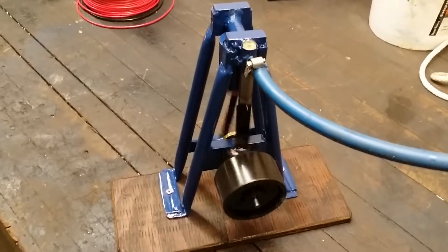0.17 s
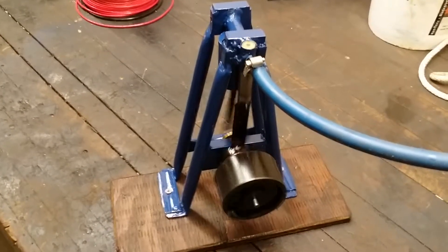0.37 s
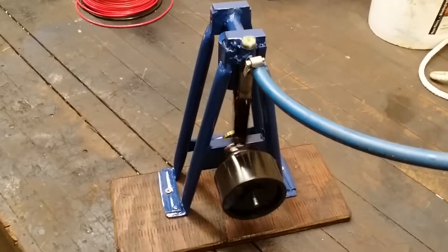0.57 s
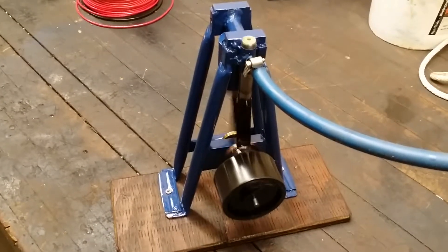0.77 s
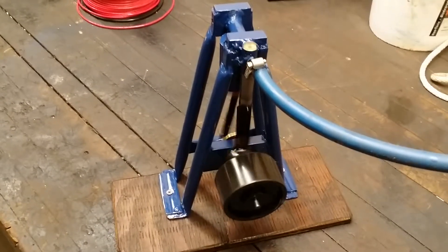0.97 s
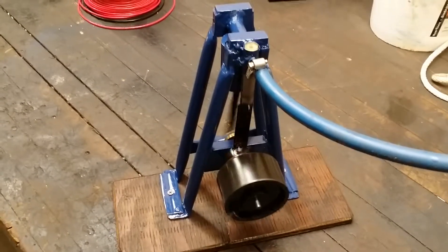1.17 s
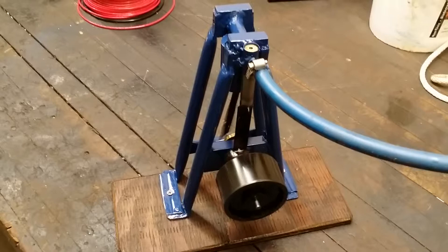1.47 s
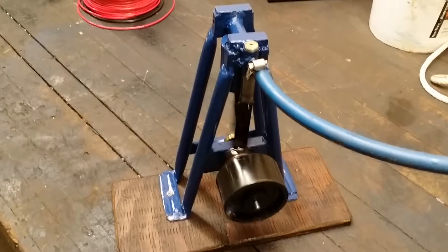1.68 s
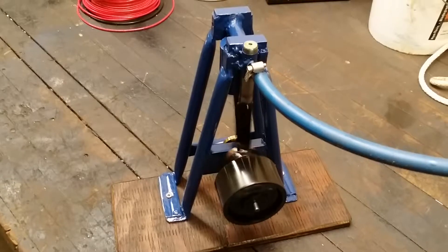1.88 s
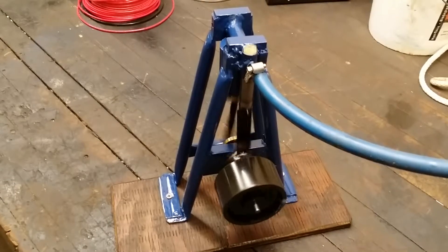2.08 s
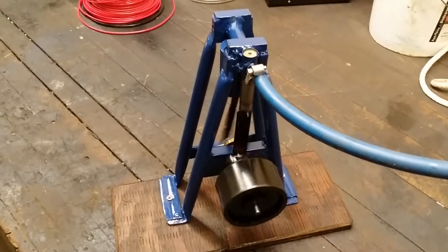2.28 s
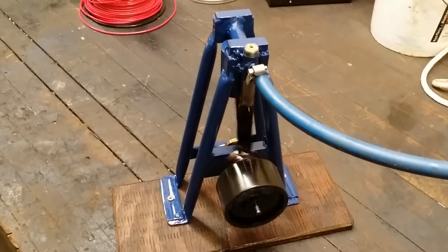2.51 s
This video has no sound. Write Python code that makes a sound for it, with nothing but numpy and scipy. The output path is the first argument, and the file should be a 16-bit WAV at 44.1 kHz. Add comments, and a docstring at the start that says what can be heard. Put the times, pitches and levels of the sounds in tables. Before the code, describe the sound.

A small air-driven engine chuffs rapidly, each turn a sharp whistling hiss and metallic knocks.

```python
"""A steady workshop rumble and a swell of hiss come first, then a crank knock and a rising whistle.
A small oscillating-cylinder engine on a wooden bench runs on compressed air, about six turns a second.
Each turn the opening port gives an edge tone and jet noise, and the crank knocks at both dead centres,
exciting the modes of frame and board. Short echoes follow; the rumble is shaped noise with faint tones.
The two microphones colour the treble differently, and the recorder ducks under the whistles."""
import sys
import numpy as np
from scipy import signal
from scipy.fft import rfft, irfft, next_fast_len
from scipy.io import wavfile

SR = 44100
rng = np.random.default_rng(int(sys.argv[2]) if len(sys.argv) > 2 else 0)


def makeup_ratio(level_db):
    """Linear amplitude ratio for a level in decibels (20 dB per factor of ten)."""
    decades = np.asarray(level_db, float) / 20
    return 10 ** decades


def digitize_waveform(pressure):
    """Quantize a signal to 16-bit integers and store it at the path in sys.argv[1].

    Rows of a 2-D input are taken as channels; values are limited to [-1, 1].
    """
    field = np.atleast_2d(pressure).T
    bounded = np.clip(field, -1, 1)
    quanta = np.round(bounded * 32767).astype(np.int16)
    wavfile.write(sys.argv[1], SR, quanta)


N = 116865   # samples
PAD = next_fast_len(N + SR // 2)   # room for filter tails
GRID = np.arange(PAD // 2 + 1) * SR / PAD + 1e-3   # Hz, kept above 0 for the logarithm


def rms_one(x):
    """Normalisation to unit root-mean-square."""
    return x / np.sqrt(np.mean(x ** 2) + 1e-20)


def at_hz(hz, values):
    """Interpolation of a spectrum along logarithmic frequency, onto GRID."""
    return np.interp(np.log(GRID), np.log(hz), values)


def panned(x, db):
    """Intensity stereo: left minus right is db."""
    return np.array([x * makeup_ratio(db / 2), x * makeup_ratio(-db / 2)])


def drift(hz):
    """Low-pass random process: white noise through two equal poles at hz, rms 1."""
    pole = np.exp(-2 * np.pi * hz / SR)
    noise = rng.standard_normal(N + SR)
    slow = signal.lfilter([1], [1, -2 * pole, pole * pole], noise)
    return rms_one(slow[SR:])


def stereo_noise(spectrum, alike):
    """Partial coherence: mid and side noise mixed to a left-right likeness per frequency, rms 1."""
    mid, side = rfft(rng.standard_normal((2, PAD)))
    alike = np.clip(alike, -1, 1)
    pair = np.sqrt(1 + alike) * mid + np.sqrt(1 - alike) * side * [[1], [-1]]
    colour = makeup_ratio(at_hz(*np.transpose(spectrum)))
    return rms_one(irfft(pair * colour, PAD)[:, :N])


def ring(x, hz, t60):
    """Damped resonator: a unit click starts a sine of height 1 before decay, falling 60 dB in t60 s."""
    pole = makeup_ratio(-60 / (t60 * SR))
    angle = 2 * np.pi * hz / SR
    return signal.lfilter([0, np.sin(angle)], [1, -2 * pole * np.cos(angle), pole * pole], x + 1e-18)


# Rumble spectrum: (frequency [Hz], relative density [dB])
RUMBLE = [(25, -62), (50, -75), (66, -15.5), (76, 0), (100, -12), (130, -4), (152, -13.5), (178, -14),
          (200, 0.5), (240, -4.5), (290, -12), (520, -17.5), (700, -19.5), (1300, -20), (2200, -22.5),
          (3200, -30.5), (15000, -33)]
# Coherence of the rumble between the ears: (frequency [Hz], left-right likeness [0 to 1])
LIKENESS = [(30, 0.69), (60, 0.98), (200, 0.95), (400, 0.86), (700, 0.24), (1200, 0.014), (2400, 0.055)]
# Wavering tones, equal in both channels: (frequency [Hz], level [dB], bandwidth [Hz])
HUMS = [(708, -48.5, 8), (938, -50.5, 2.5), (969, -52, 2.5)]
RUMBLE_DB, RUMBLE_SWAY_DB, RUMBLE_SWAY_HZ = -28, 1.5, 30.5


def workshop():
    """Room resonance: rumble peaks at the low modes, and narrow-band noise is heard as wavering tones."""
    level = RUMBLE_DB + RUMBLE_SWAY_DB * drift(RUMBLE_SWAY_HZ)
    out = makeup_ratio(level) * stereo_noise(RUMBLE, at_hz(*np.transpose(LIKENESS)))
    for hz, db, width in HUMS:
        t60 = np.log(1000) / (np.pi * width)   # decay time of a resonance this wide
        tone = ring(rng.standard_normal(N + SR), hz, t60)[SR:]   # the build-up is left off
        out = out + makeup_ratio(db) * rms_one(tone)
    return out


# Turn marks, one per whistle: (time [s], whistle level relative to the others [dB])
TURNS = [(0.0378, -10.5), (0.1971, -9.5), (0.3559, -9), (0.5151, -8.5), (0.6747, -10), (0.835, -10.5),
         (0.9948, -10.5), (1.1544, -8), (1.3134, -9), (1.4726, -8.5), (1.631, -9.5), (1.7895, -8.5),
         (1.9495, -8.5), (2.1084, -10), (2.2686, -11), (2.4278, -9), (2.59, -11.5)]
TURN_S = 0.1594   # nominal period


def crank():
    """Periodic motion: turn number and time after its mark [s], for every sample."""
    marks = np.array(TURNS)[:, 0]
    first = FLOW[0][0]   # the flow begins ahead of the mark
    t = np.arange(N) / SR
    turn = np.clip(np.searchsorted(marks + first, t) - 1, 0, len(marks) - 1)
    since = t - marks[turn]
    return turn, np.where(since < first, since + TURN_S, since)


# Air flow through the port over one turn: (time after the mark [s], relative level [dB])
FLOW = [(-.040, -16), (-.027, -4), (-.012, -2), (.004, 9), (.022, 6.5), (.032, -1), (.090, -4), (.102, -12),
        (.119, -22)]
# Jet noise spectrum: (frequency [Hz], relative density [dB])
JET = [(800, -42), (2000, -16.5), (4500, 2), (7000, 1.5), (15000, -1.5)]
HISS_DB, HISS_FLICKER_DB, SPUTTER_HZ, HISS_ALIKE = -32, 2.5, 150, 0.11   # levels at 0 dB of flow
PORT_HZ, PORT_T60_S, PORT_DB, PORT_PAN_DB = 6700, 0.0051, -35.5, 1   # the port sings faintly
OCTAVE_T60_S, OCTAVE_DB = 0.0011, -41.5   # a broader band an octave up
PORT_FROM_S = 0.04   # half-way through the swell of both bands, after the mark


def hiss(since):
    """Turbulent jet noise follows the flow; later in the turn it excites port resonance and its octave."""
    narrow = rms_one(ring(rng.standard_normal(N), PORT_HZ, PORT_T60_S))
    song = panned(makeup_ratio(PORT_DB) * narrow, PORT_PAN_DB)
    broad = rms_one(ring(rng.standard_normal((2, N)), 2 * PORT_HZ, OCTAVE_T60_S))
    song = song + makeup_ratio(OCTAVE_DB) * broad
    jet = makeup_ratio(HISS_DB + HISS_FLICKER_DB * drift(SPUTTER_HZ)) * stereo_noise(JET, HISS_ALIKE)
    flow = makeup_ratio(np.interp(since, *np.transpose(FLOW)))
    swell = np.clip(since / PORT_FROM_S - .5, 0, 1)
    return flow * (jet + song * swell)


# Crank knocks, soft and hard in turn: (time [s], relative level [dB])
KNOCKS = [(0.0129, -25.5), (0.092, -21.5), (0.171, -27.5), (0.2511, -22.5), (0.3324, -30), (0.41, -22),
          (0.49, -26.5), (0.5698, -22), (0.6443, -28.5), (0.731, -22), (0.8098, -26), (0.8908, -21),
          (0.9711, -28.5), (1.05, -21.5), (1.1308, -27.5), (1.2087, -20), (1.289, -27), (1.3684, -20.5),
          (1.4471, -31), (1.5269, -20.5), (1.606, -26), (1.685, -21), (1.7659, -26), (1.8438, -21),
          (1.9238, -27.5), (2.0043, -22.5), (2.0848, -31), (2.1632, -21), (2.2436, -29), (2.3238, -23),
          (2.4022, -26), (2.4825, -22), (2.56, -28.5), (2.6414, -21.5)]
# Steps in which each knock lands: (delay [s], relative level [dB])
CONTACTS = [(0, 0), (.0038, -4.5), (.008, -10)]
# Modes of frame and board: (frequency [Hz], relative level [dB], t60 [s], left minus right [dB])
FRAME = [(566, -5, 0.1, 2), (713.5, -0.5, 0.028, 10), (1152, -2.5, 0.1, 16), (1299, -9.5, 0.056, 6.5),
         (1630, -3, 0.042, 19), (1769, -6, 0.094, -15), (2444, 0.5, 0.04, -12.5), (3351, -2.5, 0.022, 3),
         (3972, -4, 0.019, -9.5), (6740, 3.5, 0.0098, -1), (7753, -0.5, 0.011, -13)]
FRAME_DB, KNOCK_CUT_HZ = -6, 250   # the knocks carry little below the cut
LAG_CYCLES = 3.0   # each mode answers this many cycles late: lows travel slower in the board
SOFT_HZ, HARDNESS = 2000, 0.35   # dB lost per dB of softness and squared octave from SOFT_HZ
CONTACT_SPREAD_S, BLOW_SPREAD_DB = 0.00055, 0.75   # random scatter
RATTLE_PER_S, RATTLE_DB, RATTLE_S = 1700, -16, 0.012   # loose play chatters on after each contact
CRACK_DB, CRACK_S, CRACK_PAN_DB = 7.5, 0.0018, 1


def knocks():
    """Modal excitation: contacts and rattle ring the modes; harder blows spread further in frequency."""
    hits = np.array([(s + delay, db, loss) for s, db in KNOCKS for delay, loss in CONTACTS])
    times, levels, losses = hits.T
    chance = rng.standard_normal((len(hits), 2))
    times = times + CONTACT_SPREAD_S * chance[:, 0] * (losses < 0)   # first contacts stay in place
    at = np.clip((times * SR).astype(int), 0, N - 1)
    hard = levels - levels.max()   # 0 dB for the hardest, negative for the rest
    chatter = (rng.random(N) < RATTLE_PER_S / SR) * makeup_ratio(RATTLE_DB)

    def blows(octaves_squared):
        """Contact stiffness: softer blows lose more level away from SOFT_HZ."""
        clicks = np.zeros(N)
        spectral_loss = octaves_squared * HARDNESS * hard
        clicks[at] = makeup_ratio(levels + losses + spectral_loss + BLOW_SPREAD_DB * chance[:, 1])
        return clicks

    def dying(clicks, s):
        """Exponential decay with time constant s."""
        return signal.lfilter([1], [1, -np.exp(-1 / (s * SR))], clicks)

    out = 0
    for hz, db, t60, pan in FRAME:
        clicks = blows(np.log2(hz / SOFT_HZ) ** 2)
        clicks = clicks + dying(clicks, RATTLE_S) * chatter * rng.standard_normal(N)
        lag = np.zeros(int(LAG_CYCLES * SR / hz))
        late = np.append(lag, clicks)[:N]
        out = out + panned(ring(late, hz, t60) * makeup_ratio(FRAME_DB + db), pan)
    out = signal.sosfilt(signal.butter(2, KNOCK_CUT_HZ, "high", fs=SR, output="sos"), out)

    # a brief noise crack at each contact
    band = signal.butter(2, [5800, 10000], "band", fs=SR, output="sos")
    burst = dying(blows(4.5), CRACK_S) * rng.standard_normal((2, N))
    crack = makeup_ratio(CRACK_DB) * signal.sosfilt(band, burst)
    return out + crack * panned(0.89, CRACK_PAN_DB)[:, None]


# Whistle over one turn: (time after the mark [s], central pitch [Hz], relative level [dB],
# left minus right [dB])
WHISTLE = [(-.011, 5480, -24.5, 16), (-.006, 6200, -28, 12), (.0005, 7216, -6, -7.5),
           (.010, 9260, -7.5, -6), (.017, 11480, -5, -2), (.022, 12500, -14.5, -2), (0.027, 13410, -37, -4)]
WHISTLE_DB = -5.5   # added to the levels of WHISTLE and TURNS
WAVER, WAVER_HZ, PITCH_SPREAD = 0.04, 600, 0.015   # pitch scatter as fractions, within and between turns
FLUTTER_DB, FLUTTER_HZ = 6, 450


def whistle(turn, since):
    """Edge tone: pitch climbs as the port slides open, wavering in pitch and strength, its beam swinging."""
    s, hz, db, pan = np.transpose(WHISTLE)
    spread = PITCH_SPREAD * rng.standard_normal(len(TURNS))[turn]
    pitch = np.interp(since, s, hz) * (1 + WAVER * drift(WAVER_HZ) + spread)
    level = np.interp(since, s, db, left=-99, right=-99)
    level = level + np.array(TURNS)[turn, 1] + WHISTLE_DB
    level = level + FLUTTER_DB * np.minimum(drift(FLUTTER_HZ), 1)   # upward flutter is limited
    tone = np.sin(2 * np.pi * np.cumsum(pitch) / SR)
    return panned(makeup_ratio(level) * tone, np.interp(since, s, pan))


# Bench and wall echoes, one list for left and one for right: (time [s], gain relative to direct sound)
ECHOES = [
    [(.0022, 0.58)],
    [(.0031, 0.35)],
]
ROOM_DB, ROOM_T60_S, ROOM_FROM_S = -11.5, 0.045, 0.008   # tail energy relative to direct sound


def space(x):
    """Impulse-response convolution: direct sound, early reflections, a separate diffuse tail per channel."""
    t = np.arange(SR // 3) / SR
    tail = rng.standard_normal((2, len(t))) * makeup_ratio(-60 * t / ROOM_T60_S) * (t > ROOM_FROM_S)
    reply = makeup_ratio(ROOM_DB) * tail / np.sqrt(np.sum(tail ** 2, axis=1, keepdims=True)) 
    reply[:, 0] = 1   # direct sound
    for side, echoes in zip(reply, ECHOES):
        for s, gain in echoes:
            side[int(s * SR)] += gain
    return irfft(rfft(x, PAD) * rfft(reply, PAD), PAD)[:, :N]


def scene():
    """Superposition: the engine in its space over the rumble."""
    background = workshop()
    turn, since = crank()
    engine = hiss(since) + knocks() + whistle(turn, since)
    return space(engine) + background


def causal(x, db):
    """Minimum-phase filtering: the cepstrum is folded onto positive time; db is given on GRID."""
    cepstrum = irfft(np.log(makeup_ratio(db)), PAD)
    cepstrum[1:PAD // 2] *= 2
    cepstrum[PAD // 2 + 1:] = 0
    return irfft(rfft(x, PAD) * np.exp(rfft(cepstrum)), PAD)[:N]


# Microphone colour: (frequency [Hz], left gain [dB], right gain [dB])
MICS = [(393, -1.5, 2), (1000, -5.5, -0.5), (1560, -3, -2), (2420, -5, -10.5), (2610, 1, 0.5),
        (4900, -6.5, -0.5), (6160, 2, 0), (6800, 4, 2.5), (7230, 5, 7.5), (8640, -10.5, 12),
        (10800, -4.5, 6.5), (10900, -4, 9), (13900, -3, 9), (15100, -1, -15)]


def microphones(x):
    """Frequency response: each channel has its own colour."""
    hz, *sides = np.transpose(MICS)
    return np.array([causal(channel, at_hz(hz, db)) for channel, db in zip(x, sides)])


DUCK_FROM_DB, DUCK_SHARE = -19, 0.29   # dB of cut per dB above the threshold
DUCK_SENSE_S, DUCK_BACK_DB_PER_S = 0.0025, 300


def gain_control(x):
    """Dynamic compression: the louder channel's level cuts both; gain recovers at a steady dB rate."""
    pole = np.exp(-1 / (DUCK_SENSE_S * SR))
    power = signal.lfilter([1 - pole], [1, -pole], np.max(x ** 2, axis=0))
    level = 10 * np.log10(power + 1e-12)
    climb = DUCK_BACK_DB_PER_S * np.arange(N) / SR
    wanted = DUCK_SHARE * np.maximum(level - DUCK_FROM_DB, 0)
    cut = np.maximum.accumulate(wanted + climb) - climb   # never falls faster than the recovery
    return x * makeup_ratio(-cut)


def band_limit(x):
    """A steep low-pass at the top of the band."""
    return signal.sosfilt(signal.butter(12, 15690, fs=SR, output="sos"), x)


def record(dry):
    """Signal chain: microphone response, gain control, then a steep elliptic low-pass."""
    levelled = gain_control(microphones(dry))
    top_cut = signal.ellip(10, .5, 80, 14650, fs=SR, output="sos")   # edge in Hz
    mix = signal.sosfilt(top_cut, levelled)
    return band_limit(mix)


dry = scene()
out = record(dry)
digitize_waveform(out)
```